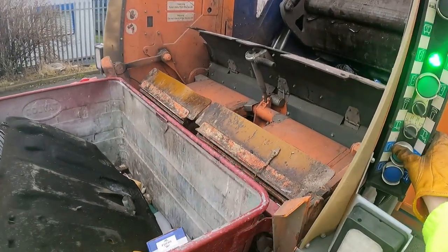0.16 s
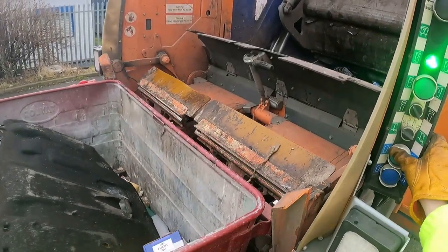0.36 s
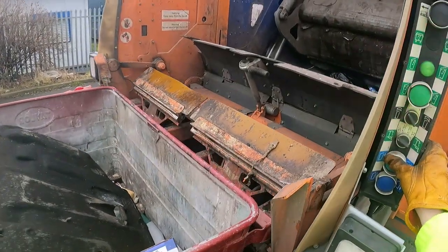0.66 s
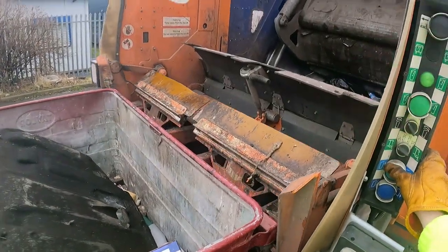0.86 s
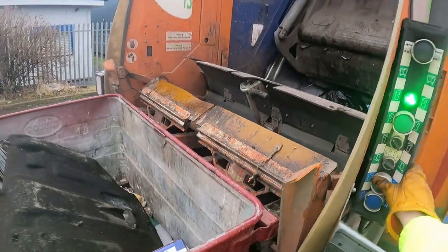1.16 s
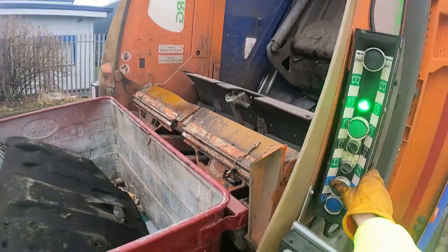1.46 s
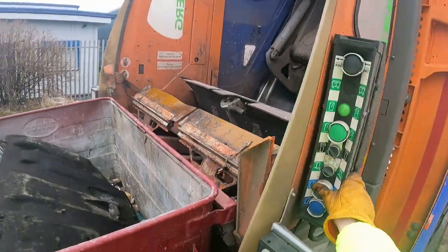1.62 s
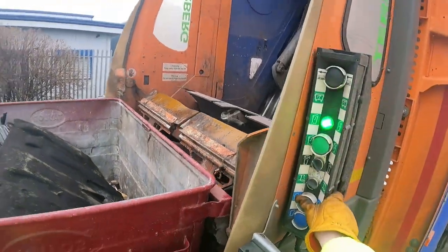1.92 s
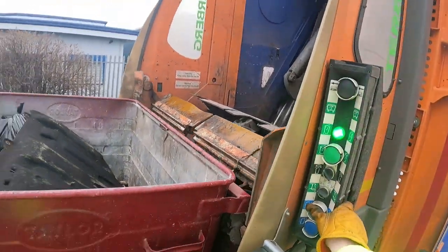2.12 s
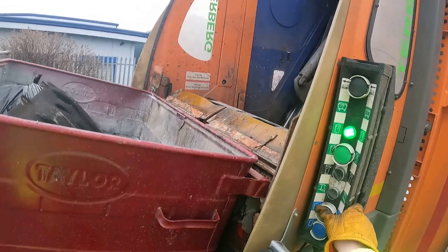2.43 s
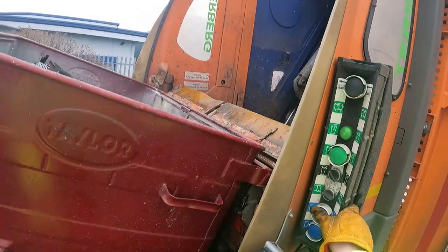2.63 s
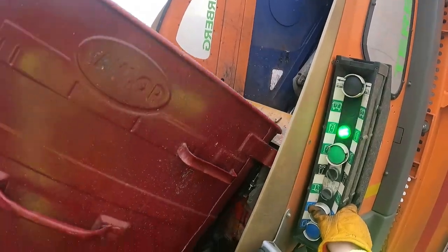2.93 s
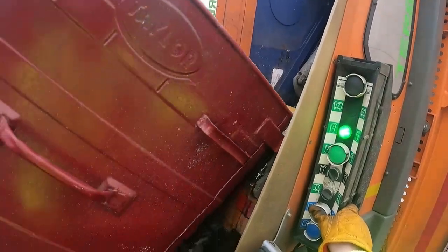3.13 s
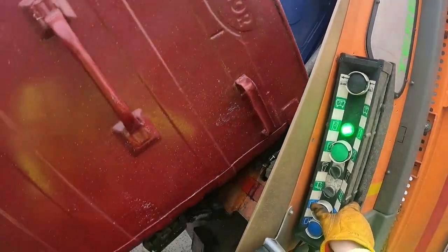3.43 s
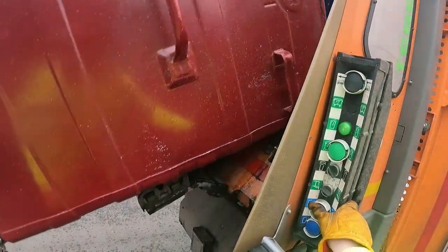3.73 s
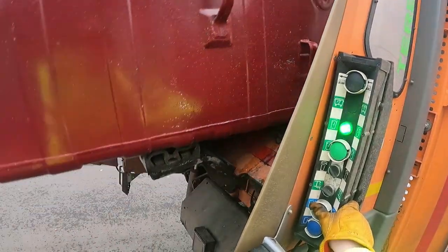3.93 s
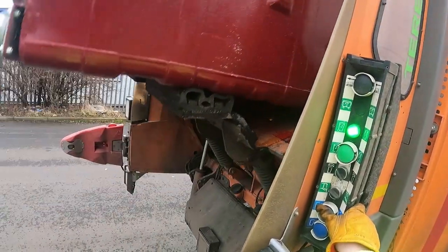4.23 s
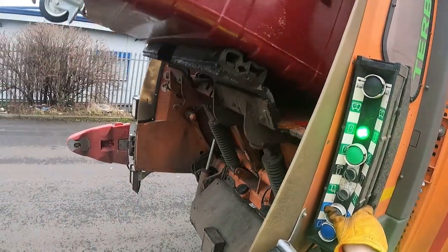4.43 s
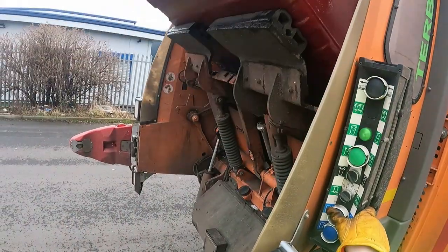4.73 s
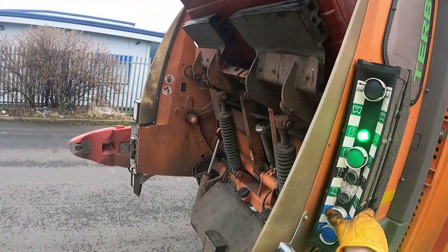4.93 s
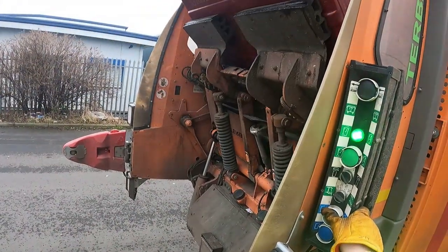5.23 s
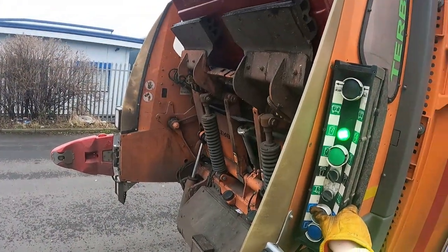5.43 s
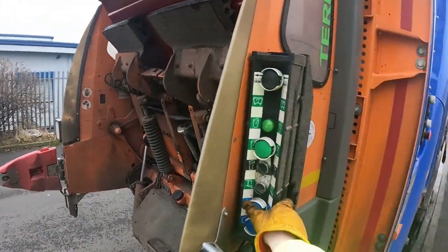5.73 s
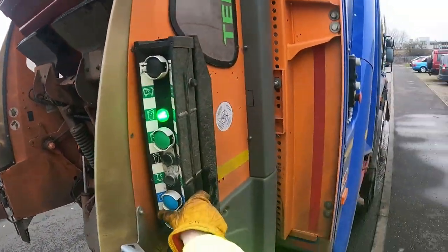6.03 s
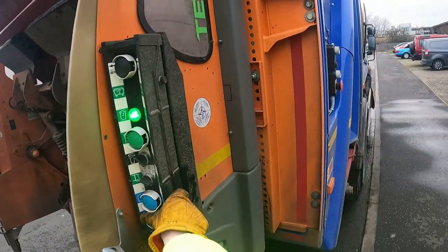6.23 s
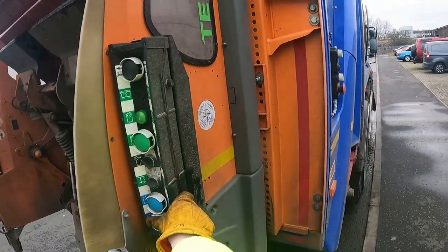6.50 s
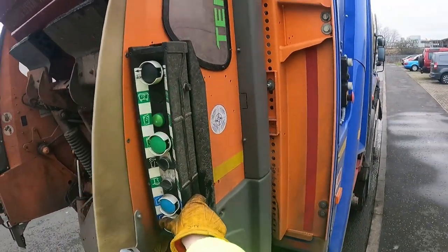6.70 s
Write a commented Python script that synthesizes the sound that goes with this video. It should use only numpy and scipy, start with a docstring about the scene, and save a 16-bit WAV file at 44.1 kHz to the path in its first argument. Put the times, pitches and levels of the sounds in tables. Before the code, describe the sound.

Outdoors, close to a refuse truck's rear, an engine and hydraulic pump drone over deep body shudder. Steel clanks and short scrapes come first, then a ringing slam as the lift takes the bin. A thin high squeal accompanies the swing. Hard knocks lead into rubbish pouring out with dense banging, booming bags and crackling scraps, before it thins to engine. Close stereo microphone, slightly hollow and boxy.

```python
"""A refuse truck's rear lift hooks a steel wheeled bin, swings it up and tips it, heard close by at the control
panel. Filtered noise and hum make the engine and pump; low sines and rumble make the body shudder. The bin
clanks and rings as decaying modes, scrapes in dense grains, and a pivot squeals as one wandering tone. Rubbish
pours into the hopper as showers of small impacts, with thumping bags and snapping scraps. A pair of close
microphone ports picks it all up; a hollow ring near 1.1 kHz runs through much of it."""
import sys
import numpy as np
from scipy import signal
from scipy.fft import rfft, irfft
from scipy.io import wavfile
from scipy.ndimage import uniform_filter1d

SR = 44100
rng = np.random.default_rng(int(sys.argv[2]) if len(sys.argv) > 2 else 0)


def int16_out(signal):
    """Quantize to a 16-bit WAV file."""
    q = np.round(np.clip(np.atleast_2d(signal).T, -1, 1) * 32767)
    wavfile.write(sys.argv[1], SR, q.astype(np.int16))


N = 302526

# All colours below are spectral shapes; the level is set after filtering.
# engine noise: (time [s], level [dB])
ENGINE_LEVEL = [(0, -44), (1.1, -43), (1.4, -42.5), (2, -42), (3.2, -41.5), (3.9, -38.5), (6.86, -41.5)]
# engine spectrum: (frequency [Hz], gain [dB])
ENGINE_COLOUR = [(41, -14.5), (70, -0.5), (205, -8), (245, -9), (310, -10), (369, -13.5), (400, -16),
                 (471, -14.5), (755, -18.5), (1050, -4), (1430, -13), (1900, -15.5), (2150, -25.5),
                 (2980, -22.5), (3450, -33), (7820, -38.5), (9410, -58.5), (12200, -100.5)]
# hum of the loaded hydraulic pump: (nominal frequency [Hz], mean level against the engine noise at full load [dB])
PUMP_HUM = [(189, -22), (211, -13), (314, -20), (969, -20.5), (1104, -13.5), (1550, -22.5), (1825, -22)]
# pump speed under the changing load, as a factor on the hum's pitch: (time [s], relative speed [1])
PUMP_SPEED = [(1.3, 1), (2.3, 1.025), (3.2, .992), (3.7, 1.03)]

# slow shudder of the truck body, before the sway and rumble trims: (time [s], mean level [dB])
SHUDDER_LEVEL = [(0, -33), (1.3, -29.5), (2.0, -31.5), (2.9, -33.5), (3.6, -39), (6.3, -37), (6.86, -28.5)]
# body rumble spectrum: (frequency [Hz], gain [dB])
SHUDDER_COLOUR = [(12, -1.5), (22, 2.5), (32, -6), (48, 1.5), (70, -24), (110, -26.5), (200, -40)]
# jolts of the lift that set the body rocking: (time [s], gain of the rocking [dB])
BODY_JOLTS = [(0, -14), (0.143, -19), (0.626, -10.5), (0.841, -12.5), (1.0, -17), (1.45, -20),
              (1.626, -9.5), (2.004, -24), (2.38, -19.5), (5.34, -21)]
JOLT_RISE_S, JOLT_T60_S = 0.017, 0.24

# blows between lift, bin and load, levels before the trims of each part:
# (time [s], clank level [dB], thud level [dB], thud pitch [Hz], hardness [0-1])
BLOWS = [(.002, -21, -22, 94.5, 0.56), (.057, -20, -24.5, 327, 0.28), (0.164, -25.5, -45, 147, 0),
         (0.312, -35, -36, 314, 0.3), (.348, -34, -44, 335, 0), (.516, -29.5, -28.5, 212.6, 0.4),
         (0.578, -30, -39, 198, 0.33), (0.656, -30, -39, 116, 0.85), (0.825, -21.5, -34, 120, 0.23),
         (.838, -20, -23, 107, 0.15), (1.598, -25.5, -32, 127, 0.82), (1.604, -17.5, -32, 121, 0.49),
         (1.611, -17.5, -29, 198, 0.24), (1.924, -41, -45, 162, 0.95), (2.160, -32, -36.5, 109, 0.82),
         (2.542, -38, -64, 137.7, 0), (2.704, -35, -47, 197, 0.1), (2.726, -38, -49, 191, 0.76),
         (3.334, -41, -34, 304, 0.4), (3.529, -18, -35, 434, 0.82), (3.546, -18.5, -38, 355, 0.4),
         (3.588, -23, -47, 204, 0.81), (3.828, -29.5, -37, 219, 0.6), (4.039, -31.5, -59, 148, 0.6),
         (4.247, -24.5, -39, 233, 0.8), (4.362, -21.5, -26, 280, 0.52), (4.486, -20.5, -35, 402, 0.64),
         (4.520, -22, -34, 248, 0.2), (4.749, -23, -37, 200, 0.27), (4.85, -16.5, -33.5, 230, 0.5),
         (4.910, -13.5, -35, 196, 0.38), (4.945, -17, -37, 199, 0.54), (5.031, -26, -37, 237, 0.8),
         (5.068, -20.5, -45, 198, 0.2), (5.141, -11.5, -27, 169, 0.1), (5.219, -14.5, -30, 263, 0),
         (5.317, -12.5, -28, 180, 0), (5.403, -16.5, -31.5, 271, 0.55), (5.424, -13, -26, 358, 0.5),
         (5.495, -20, -31, 185, 0.75), (5.617, -15.5, -24, 195, 0.47), (5.663, -19, -27, 157, 0.76),
         (5.752, -23.5, -22.5, 206, 0.96), (5.833, -19.5, -27, 441, 0.5), (5.922, -26, -40, 243.3, 0.6),
         (6.011, -25, -50, 225, 0.6), (6.09, -33.5, -46, 208, 0.62), (6.204, -31, -36, 145, 0.7),
         (6.529, -54, -33.5, 196.5, .2), (6.605, -39.5, -39.5, 203, 0.72)]
# ringing of the steel bin, nominal: (frequency [Hz], level [dB], t60 [s])
BIN_MODES = [(784, -9, 0.12), (814, -14.5, 0.18), (937, -11, 0.31), (1002, -12, 0.22), (1069, -1, 0.33),
             (1120, -1.5, 0.27), (1163, -.5, 0.23), (1222, -3.5, 0.27), (1282, -7.5, 0.26),
             (1416, -17, 0.13), (1754, -13, 0.12), (1880, -19, 0.17)]
# clank of the contact: (frequency [Hz], gain [dB])
CLANK_COLOUR = [(380, -39), (560, -25.5), (690, -7), (880, -6), (1170, 1), (1330, -11), (1600, -17.5),
                (2100, -39.5), (2600, -36)]
# thud of the frame: (frequency [Hz], gain [dB])
THUD_COLOUR = [(45, -2.5), (90, 1), (190, -2.5), (320, -5.5), (480, -10.5), (800, -18)]
# clatter above the bin's main ring: (frequency [Hz], gain [dB])
CLATTER_COLOUR = [(1100, -6.5), (1500, 6.5), (1950, -1), (2250, -2.5), (2550, -18.5), (2950, -7),
                  (3500, -19), (4500, -20.5), (7000, -68)]
# treble crack of a hard contact: (frequency [Hz], gain [dB])
CRACK_COLOUR = [(2000, -15), (3000, -0.5), (3500, -2), (4300, 3.5), (6500, -7), (7550, 2), (8300, -13),
                (9800, -28.5), (12200, -34.5), (14500, -55.5)]
# a blow's treble against its listed clank level, from the softest to the hardest contact (dB)
SOFT_CLATTER_DB, HARD_CLATTER_DB, SOFT_CRACK_DB, HARD_CRACK_DB = -24, -1, -43.5, -8
BLOW_T60_S = 0.3

# hard scraps and grit hitting the steel, with one faint early creak near 0.155 s, levels before the overall
# trim and final colouring: (time [s], peak level [dB], pitch [Hz], rattle t60 [s], gain an octave either side
# [dB])
TICKS = [(.155, -58, 6500, .12, -4), (1.537, -55.5, 5900, .05, -4), (4.002, -45.5, 8450, 0.1, -15),
         (4.068, -53, 7500, 0.15, -8), (4.115, -49.5, 4500, 0.063, -7), (4.188, -51.5, 7440, 0.077, -13),
         (4.272, -41, 7500, 0.11, -1), (4.427, -35.5, 5000, 0.02, -19), (4.454, -51, 6100, 0.074, -9),
         (4.481, -42, 5940, 0.12, -19), (4.498, -38, 7000, 0.074, -5), (4.568, -25.5, 6770, 0.041, -49),
         (4.646, -43.5, 6800, 0.058, -19), (4.665, -44, 6600, 0.19, -32), (4.698, -45, 6600, 0.073, -29),
         (4.731, -43.5, 7000, 0.24, -14), (4.796, -38.5, 6250, 0.04, -20), (4.848, -39.5, 6800, 0.29, -12),
         (4.905, -38, 5000, 0.12, -1), (4.996, -38.5, 7400, 0.15, -19), (5.107, -43.5, 7400, 0.41, -13),
         (5.216, -32, 5500, 0.12, 0), (5.305, -38, 7240, 0.12, -6), (5.422, -36, 7300, 0.15, -13),
         (5.494, -32.5, 7700, 0.05, -15), (5.542, -45, 8040, 0.034, -12), (5.756, -40, 5500, 0.19, 8),
         (6.029, -53, 4560, 0.2, -13)]
# spectrum shared by the ticks: (frequency [Hz], gain [dB])
TICK_COLOUR = [(2400, 2), (2950, 2), (3500, -12), (4250, 1.5), (5100, -4.5), (5900, 4), (6400, -12),
               (7350, 3.5), (8000, -6.5), (9200, -13), (10200, -25.5), (12200, -21.5), (14500, -49)]

# rubbing on steel, first the lifting comb along the rim, then the last rubbish sliding out:
# (time [s], attack [s], time from start to release [s], rub level [dB], hiss level [dB])
SCRAPES = [(0.573, 0.005, 0.063, -29, -49.5), (0.624, 0.049, 0.051, -30.5, -41),
           (0.679, 0.012, 0.034, -40.5, -63), (2.056, 0.05, 0.12, -37.5, -48), (5.8, 0.051, 0.17, -31, -49),
           (6.13, 0.06, 0.16, -49, -57.5)]
# rub spectrum: (frequency [Hz], gain [dB])
RUB_COLOUR = [(700, -20), (900, -1), (1030, 8), (1200, 7), (1400, -7.5), (1900, -11.5), (2500, -28)]
# hiss spectrum: (frequency [Hz], gain [dB])
HISS_COLOUR = [(2000, 1), (2500, 9.5), (2900, 12.5), (3450, 6), (3800, 17), (4350, 14.5), (5000, 4),
               (5500, 2), (7600, -6), (9500, -31), (13000, -49)]

# oil forced through the valve: (frequency [Hz], gain [dB])
VALVE_COLOUR = [(800, -12), (930, 9), (1150, -8), (1400, -9), (1780, -1.5), (2200, -18), (3700, -30),
                (4550, -19), (5200, -40)]
# the bin swings against the lift's stop (s)
SLAM_S = 1.611
# short squeaks of rubbing parts: (time [s], length [s], start pitch [Hz], end pitch [Hz], peak level [dB])
CHIRPS = [(2.233, 0.047, 2790, 2590, -51.5), (2.713, 0.036, 1810, 1820, -42.5),
          (4.775, 0.086, 2420, 2280, -42.5)]
# a dry pivot, before jitter and flutter: (time [s], pitch [Hz], level [dB])
SQUEAL = [(2.865, 6960, -77), (2.895, 7090, -61), (2.915, 7060, -35.5), (2.945, 7000, -41),
          (2.96, 7025, -58), (2.975, 6980, -39), (3.05, 6990, -42), (3.11, 6965, -49), (3.205, 6950, -48.5),
          (3.305, 6915, -34), (3.335, 6890, -44), (3.355, 6930, -61), (3.39, 6900, -65)]

# flow of rubbish out of the bin, which steers its layers: (time [s], flow [dB])
POUR_FLOW = [(3.8, -48), (4.2, -42), (4.45, -30.5), (4.65, -33.5), (4.83, -32.5), (4.99, -26),
             (5.05, -21.5), (5.32, -21), (5.37, -26), (5.45, -19), (5.92, -26.5), (5.97, -34.5),
             (6.08, -43.5), (6.55, -54)]
# clumps that break loose: (time [s], length [s], peak extra rush [dB], peak extra tumbling [dB])
CLUMPS = [(4.47, 0.16, 5.5, 3), (4.685, 0.19, 1.5, 6), (4.834, 0.12, 8, 5), (5.174, .2, -1, 6),
          (5.414, 0.25, 0.5, 4.5), (6.173, 0.17, 13, 3.5)]
# rush along the steel: (frequency [Hz], gain [dB])
RUSH_COLOUR = [(350, -20.5), (520, -12.5), (720, -10), (900, -10.5), (1030, 1), (1125, 2.5), (1260, -8),
               (1500, -10.5), (1900, -19), (2300, -15.5), (2550, -34), (2900, -15), (3500, -40)]
# heavy pieces tumbling: (frequency [Hz], gain [dB])
TUMBLE_COLOUR = [(40, -18), (65, -0.5), (95, 1.5), (180, -3.5), (300, -3.5), (450, -10.5), (750, -13.5)]
# light litter crackling: (frequency [Hz], gain [dB])
CRACKLE_COLOUR = [(2400, -8), (2950, -24), (3500, -5.5), (4250, 3), (4800, -3.5), (5900, -2.5), (6550, -4),
                  (7500, 1), (8400, -8.5), (9600, -21), (12200, -39), (14500, -60)]
FULL_FLOW_DB = -21
# level at full flow (dB) and dB gained per dB of flow
TUMBLE_DB, TUMBLE_SLOPE, CRACKLE_DB, CRACKLE_SLOPE = -29.5, 0.71, -37, 0.92
# light litter leaves first, so the crackle thins towards the end
LITTER_GONE_S, LITTER_FALL_DB_PER_S = 5.49, 24.5
# heavy bags landing in the hopper, before the trims of each part: (time [s], level [dB], pitch [Hz])
BAG_THUMPS = [(4.385, -30, 130), (4.47, -34, 164), (4.681, -24.5, 123), (4.957, -28, 110),
              (5.16, -23.5, 175), (5.22, -19, 86), (5.264, -25, 85), (5.346, -25, 56.3),
              (5.434, -21, 101.4), (6.18, -39, 150), (6.618, -34.5, 139), (6.72, -39, 110),
              (6.83, -32, 211)]

# the two microphone ports ring differently: (frequency [Hz], signed side share of the middle [1])
PORT_SIDES = [(100, -0.014), (250, -0.015), (550, 0.071), (1000, 0.25), (1250, 0.23), (1500, -0.75),
              (1850, 0.6), (2300, -1.8), (2600, 0.68), (3300, 0.075), (5000, -0.16), (8000, 0.08)]
# reflections that differ left and right: (frequency [Hz], gain [dB])
SCATTER = [(60, -40.5), (200, -26), (600, -14.5), (1100, -17), (1700, -5.5), (2500, 0.5), (3200, -2),
           (4500, -10.5), (8000, -17.5)]
# direct level, left minus right (dB): both lean slightly right
LOAD_PAN_DB, TRUCK_PAN_DB = -0.2, -0.5
TOP_HZ = 14000


def undb(db):
    """Decibels to gain."""
    return 10 ** (np.asarray(db) / 20)


def unit(x):
    """Scale to rms 1."""
    return x / np.sqrt(np.mean(x ** 2) + 1e-18)


def curves(table):
    """Each column of a table as a control over time."""
    s, *columns = np.transpose(table)
    return [np.interp(np.arange(N) / SR, s, c) for c in columns]


def over_hz(points, size):
    """A (frequency, value) table on the bins of a transform, along a log frequency axis."""
    hz, value = np.transpose(points)
    bins_hz = np.arange(size // 2 + 1) * SR / size
    return np.interp(np.log(bins_hz + 1), np.log(hz), value)


def colour(x, points, size=8192):
    """Causal minimum-phase filter with the given spectrum, falling away beyond its ends."""
    below = (points[0][0] / 2, points[0][1] - 30)
    above = (points[-1][0] * 2, points[-1][1] - 40)
    cepstrum = irfft(over_hz([below, *points, above], size) * np.log(10) / 20)
    # folding the cepstrum forward in time makes the filter causal
    cepstrum[1:size // 2] *= 2
    cepstrum[size // 2 + 1:] = 0
    response = irfft(np.exp(rfft(cepstrum)))
    return signal.fftconvolve(x, response)[:len(x)]


def fade(t, t60):
    """Exponential decay, 60 dB down after t60 seconds."""
    return np.exp(-np.log(1000) * t / t60)


def swell(s, attack_s, hold_s, t60):
    """Attack from a start time, with an exponential release hold_s after that start."""
    t = np.arange(N) / SR - s
    return np.clip(t / attack_s, 0, 1) * fade(np.maximum(t - hold_s, 0), t60)


def walk(rate):
    """Smooth random control of rms 1, with new values at this rate (Hz)."""
    k = int(SR / rate)
    steps = np.repeat(rng.standard_normal(N // k + 1), k)
    return unit(uniform_filter1d(steps, k)[:N])


def grains(rate, spread_db, t60, size=4096):
    """Random small impacts (rate per second) of uneven size, each with a short rattling tail."""
    sizes = undb(spread_db * np.minimum(rng.standard_exponential(N), 4))
    clicks = (rng.random(N) < rate / SR) * sizes * rng.choice([-1, 1], N)
    tail = rng.standard_normal(size) * fade(np.arange(size) / SR, t60)
    energy = signal.fftconvolve(clicks ** 2, tail ** 2)[:N]
    rattle = np.sqrt(np.abs(energy)) * rng.standard_normal(N)
    return unit(clicks) + unit(rattle)


def peak(x, db, size=256):
    """Scale a hit so that its loudest few milliseconds have this rms level."""
    return x * undb(db) / np.sqrt(uniform_filter1d(x ** 2, size).max())


def add(out, s, x):
    """Mix a sound in at a time."""
    i = max(int(s * SR), 0)
    out[i:i + len(x)] += x[:N - i]


def engine(firing_hz=42, throb=0.045, waver_db=0.9, drift=0.00153, stray=0.00305):
    """Combustion noise throbs at the firing rate; the pump hums more fully once the lift takes the load."""
    phase = 2 * np.pi * np.cumsum(firing_hz * (1 + 0.036 * walk(3.09))) / SR
    noise = rng.standard_normal(N) * (1 + throb * np.cos(phase)) * undb(waver_db * walk(22))
    speed = curves(PUMP_SPEED)[0] + drift * walk(2)
    hum = np.zeros(N)
    for hz, db in PUMP_HUM:
        level = undb(db + 2 * walk(8.8))
        pitch = hz * (speed + stray * walk(60))
        hum += level * unit(np.sin(2 * np.pi * np.cumsum(pitch) / SR))
    load = np.interp(np.arange(N) / SR, [0.5, 0.9], [0.3, 1])
    return (unit(colour(noise, ENGINE_COLOUR)) + load * hum) * undb(curves(ENGINE_LEVEL)[0])


def shudder(sway_hz=30, sway_db=-2.5, rumble_db=-6.0, uneven_db=3.0, jolt_hz=28, jolt_rumble_db=-12):
    """The heavy body rocks at one low, wandering rate above a broader rumble; each jolt rocks it harder."""
    sway = unit(np.sin(2 * np.pi * np.cumsum(sway_hz * (1 + 0.0667 * walk(3.8))) / SR))
    rumble = unit(colour(rng.standard_normal(N), SHUDDER_COLOUR))
    level = undb(curves(SHUDDER_LEVEL)[0] + uneven_db * walk(8))
    out = (undb(sway_db) * sway + undb(rumble_db) * rumble) * level
    t = np.arange(N) / SR
    for s, db in BODY_JOLTS:
        rocking = np.sin(2 * np.pi * jolt_hz * (t - s)) + undb(jolt_rumble_db) * rumble
        out += undb(db) * swell(s, JOLT_RISE_S, JOLT_RISE_S, JOLT_T60_S) * rocking
    return out


def bin_ring(t, uneven_db=1.5, detune=0.0029, glancing=1):
    """The walls' modes after one knock: each contact favours others, a glancing one starts them out of step."""
    out = np.zeros(len(t))
    chance = rng.standard_normal((len(BIN_MODES), 3))
    for (hz, db, t60), (louder, sharper, later) in zip(BIN_MODES, chance):
        cycles = hz * (1 + detune * sharper) * t + glancing * later
        out += undb(db + uneven_db * louder) * fade(t, t60) * np.sin(2 * np.pi * cycles)
    return out


def boom(t, hz, t60):
    """One low panel mode, pushed softly."""
    return np.sin(2 * np.pi * hz * t) * fade(t, t60) * (1 - np.exp(-t / 0.0059))


def blows(clank_db=-5.5, ring_db=-7, thud_db=-4, boom_db=-6, contact_t60=0.014, thud_t60=0.38,
          boom_t60=0.13, clatter_t60=0.053, crack_t60=0.05, tail_db=-16):
    """Each blow clatters briefly, brighter the harder the contact, rings the bin's walls and thumps the frame."""
    out, t = np.zeros(N), np.arange(int(0.7 * SR)) / SR
    tail = fade(t, BLOW_T60_S)
    for s, db, low_db, low_hz, hardness in BLOWS:
        clatter_db = SOFT_CLATTER_DB + hardness * (HARD_CLATTER_DB - SOFT_CLATTER_DB)
        crack_db = SOFT_CRACK_DB + hardness * (HARD_CRACK_DB - SOFT_CRACK_DB)
        a, b, c, d = rng.standard_normal((4, len(t)))
        clank = colour(a * (fade(t, contact_t60) + undb(tail_db) * tail), CLANK_COLOUR)
        ring = bin_ring(t) * (1 - np.exp(-t / 0.003))
        thud = colour(b * fade(t, thud_t60), THUD_COLOUR)
        clatter = colour(c * (fade(t, clatter_t60) + undb(-5) * tail), CLATTER_COLOUR)
        crack = colour(d * (fade(t, crack_t60) + undb(-4) * tail), CRACK_COLOUR)
        add(out, s, peak(clank, db + clank_db) + peak(ring, db + ring_db))
        add(out, s, peak(thud, low_db + thud_db) + peak(boom(t, low_hz, boom_t60), low_db + boom_db))
        add(out, s, peak(clatter, db + clatter_db) + peak(crack, db + crack_db))
    return out


def ticks(tick_db=5, snap_t60=0.0027, rattle_db=-4):
    """Each tick snaps around its own pitch and rattles round the bin."""
    out, t = np.zeros(N), np.arange(SR // 5) / SR
    for s, db, hz, t60, skirt_db in TICKS:
        a, b = rng.standard_normal((2, len(t)))
        burst = a * fade(t, snap_t60) + undb(rattle_db) * b * fade(t, t60)
        snap = colour(burst, [(hz / 2, skirt_db), (hz, 0), (hz * 2, skirt_db)])
        add(out, s, peak(colour(snap, TICK_COLOUR), db + tick_db, size=96))
    return out


def scrapes(release_t60=0.14):
    """Steel sticks and slips on steel so densely that the tiny blows merge into a rasp."""
    out = np.zeros(N)
    slips = grains(rate=2000, spread_db=1.5, t60=0.015) * undb(1.2 * walk(110))
    rub, hiss = unit(colour(slips, RUB_COLOUR)), unit(colour(slips, HISS_COLOUR))
    for s, attack_s, hold_s, rub_db, hiss_db in SCRAPES:
        rasp = undb(rub_db) * rub + undb(hiss_db) * hiss
        out += swell(s, attack_s, hold_s, release_t60) * rasp
    return out


def valve(db=-45, start_s=1.235, attack_s=0.12, hold_s=0.31, t60=0.35):
    """Oil sings through the valve as the lift takes the bin's weight: a swell of coloured noise."""
    oil = unit(colour(rng.standard_normal(N), VALVE_COLOUR))
    return undb(db) * swell(start_s, attack_s, hold_s, t60) * oil


def slam(ring_db=-16.0):
    """The bin hits the lift's stop squarely: all its modes start together and ring out cleanly."""
    out, t = np.zeros(N), np.arange(SR // 2) / SR
    ring = bin_ring(t, uneven_db=1, glancing=0) * (1 - np.exp(-t / 0.0012))
    add(out, SLAM_S, peak(ring, ring_db))
    return out


def chirps(jitter=0.0072):
    """A rubbing edge squeaks for an instant: a short gliding tone."""
    out = np.zeros(N)
    for s, length, start_hz, end_hz, db in CHIRPS:
        n = int(length * SR)
        hz = np.linspace(start_hz, end_hz, n) * (1 + jitter * walk(400)[:n])
        add(out, s, peak(np.sin(2 * np.pi * np.cumsum(hz) / SR) * np.hanning(n), db))
    return out


def squeal(jitter=0.00096, flutter_db=2.0):
    """A dry pivot sings a thin, jittering note that swells as it grips and sags as the bin swings over."""
    hz, db = curves(SQUEAL)
    t = np.arange(N) / SR
    tone = unit(np.sin(2 * np.pi * np.cumsum(hz * (1 + jitter * walk(330))) / SR))
    sounding = (t > SQUEAL[0][0]) * (t < SQUEAL[-1][0])
    return tone * undb(db + flutter_db * walk(60)) * sounding


def scraps(count=380, centre_hz=1040, octaves=0.28, spread_db=3, ring_t60=0.091):
    """Loose pieces knock together, each ringing briefly at a pitch of its own, weaker far from the centre."""
    out, t = np.zeros(N), np.arange(SR // 8) / SR
    for when, (pitch, size) in zip(rng.random(count), rng.standard_normal((count, 2))):
        hz = centre_hz * 2 ** (octaves * pitch)
        knock = np.sin(2 * np.pi * hz * t) * fade(t, ring_t60)
        add(out, when * N / SR, knock * undb(spread_db * (min(size, 1) - abs(pitch))))
    return unit(out)


def rubbish(rush_db=-2.5, ring_db=-8, scraps_db=-6, clatter_db=-17, lump_db=1.02, contact_s=0.00092):
    """The load slides out in lumps: one flow makes it rush along the steel and ring it, tumble and crackle."""
    flow, = curves(POUR_FLOW)
    t = np.arange(N) / SR
    rush = flow
    tumble = TUMBLE_DB + TUMBLE_SLOPE * (flow - FULL_FLOW_DB)
    crackle = CRACKLE_DB + CRACKLE_SLOPE * (flow - FULL_FLOW_DB)
    crackle -= LITTER_FALL_DB_PER_S * np.maximum(t - LITTER_GONE_S, 0)
    for s, length, more_rush_db, more_tumble_db in CLUMPS:
        arch = np.sin(np.pi * np.clip((t - s) / length, 0, 1))
        rush = rush + more_rush_db * arch
        tumble = tumble + more_tumble_db * arch
    # 10 ms ramps at both ends of the pour
    flowing = np.clip(np.minimum(t - POUR_FLOW[0][0], POUR_FLOW[-1][0] - t) / 0.01, 0, 1)
    lumps = undb(lump_db * walk(35))

    knocks = grains(rate=300, spread_db=1.8, t60=0.035)
    crinkles = grains(rate=1000, spread_db=2.8, t60=0.06)
    rattles = grains(rate=130, spread_db=-2.0, t60=0.084)
    tumbles = grains(rate=400, spread_db=0.5, t60=0.16)
    sliding = undb(rush_db) * unit(colour(knocks, RUSH_COLOUR)) + undb(scraps_db) * scraps()
    sliding += undb(clatter_db) * unit(colour(rattles, CLATTER_COLOUR))
    # the same knocks that rush along the steel also ring it
    ring_t = t[:SR // 2]
    walls = bin_ring(ring_t, uneven_db=1.5) * (1 - np.exp(-ring_t / contact_s))
    ringing = undb(ring_db) * unit(signal.fftconvolve(knocks, walls)[:N])
    falling = unit(colour(tumbles, TUMBLE_COLOUR)) * undb(tumble)
    crinkling = unit(colour(crinkles, CRACKLE_COLOUR)) * undb(crackle)
    return flowing * lumps * ((sliding + ringing) * undb(rush) + falling + crinkling)


def thumps(thump_t60=0.2, boom_db=-4.5, dull_db=-8):
    """Heavy bags boom on the hopper floor: one low mode and a dull burst of noise."""
    out, t = np.zeros(N), np.arange(SR // 2) / SR
    for s, db, hz in BAG_THUMPS:
        dull = colour(rng.standard_normal(len(t)) * fade(t, thump_t60), TUMBLE_COLOUR)
        add(out, s, peak(boom(t, hz, thump_t60), db + boom_db) + peak(dull, db + dull_db))
    return out


def scene(size=2 ** 19):
    """All sources reach two close microphone ports; the truck's panels scatter a little to the sides."""
    truck = engine() + shudder() + blows() + scrapes() + valve() + slam() + chirps() + squeal()
    load = ticks() + rubbish() + thumps()
    t = np.arange(SR // 10) / SR
    panels = rng.standard_normal(len(t)) * fade(t, 0.13)
    panels /= np.sqrt(np.sum(panels ** 2))
    scatter = rfft(panels, size) * undb(over_hz(SCATTER, size))
    # the side signal is added on the left and subtracted on the right
    side = irfft(rfft(truck + load, size) * (over_hz(PORT_SIDES, size) + scatter))[:N]
    ear = np.array([[1], [-1]])
    direct = truck * undb(ear * TRUCK_PAN_DB / 2) + load * undb(ear * LOAD_PAN_DB / 2)
    return direct + ear * side


def record(dry):
    """The sound has next to nothing above its top frequency: a steep elliptic low-pass."""
    low_pass = signal.ellip(8, 0.2, 70, TOP_HZ, fs=SR, output="sos")
    return signal.sosfilt(low_pass, dry)


dry = scene()
out = record(dry)
int16_out(out)
```